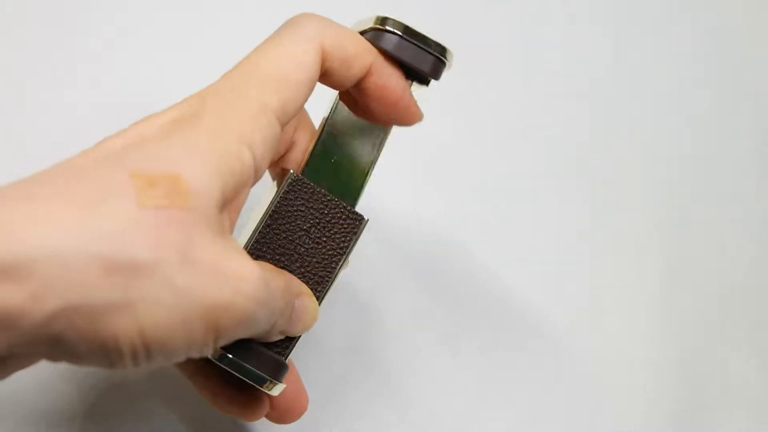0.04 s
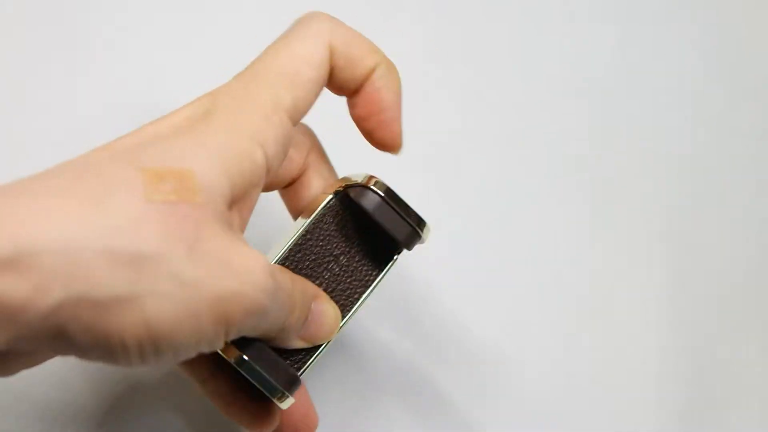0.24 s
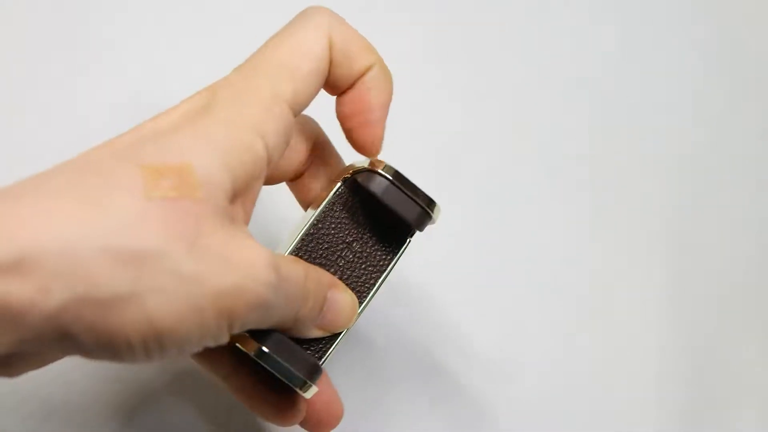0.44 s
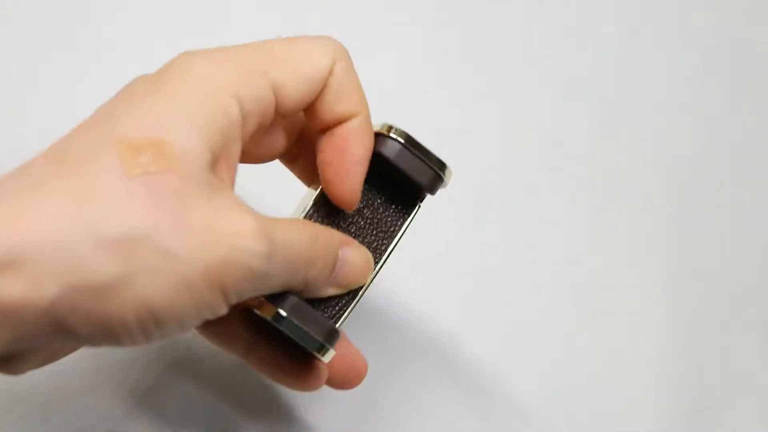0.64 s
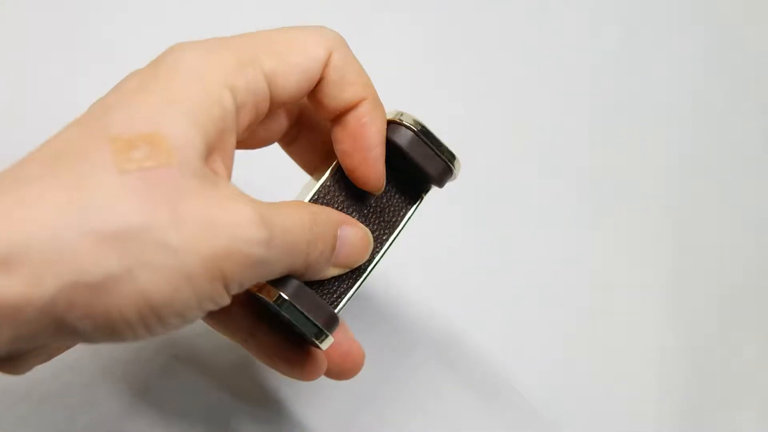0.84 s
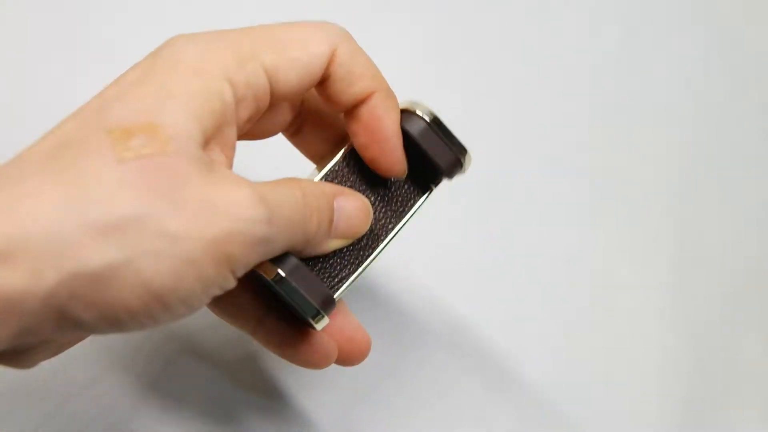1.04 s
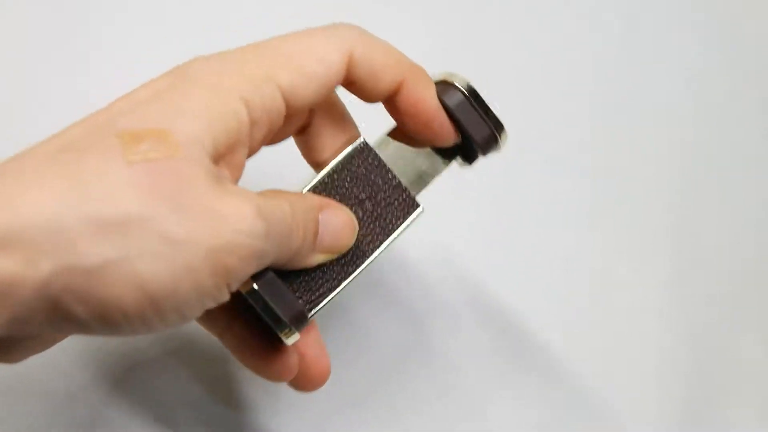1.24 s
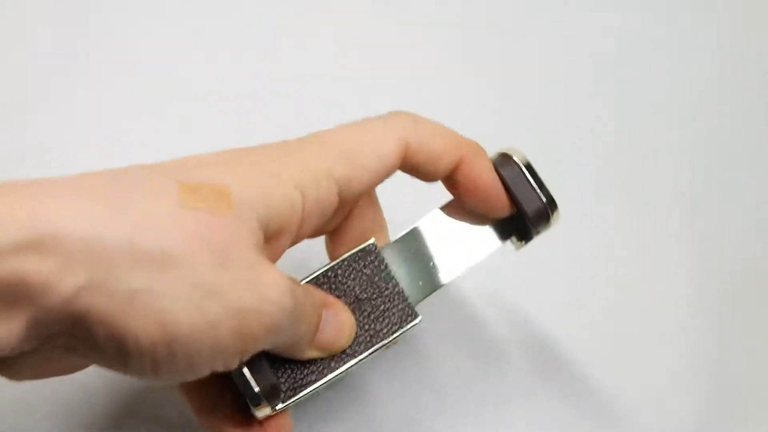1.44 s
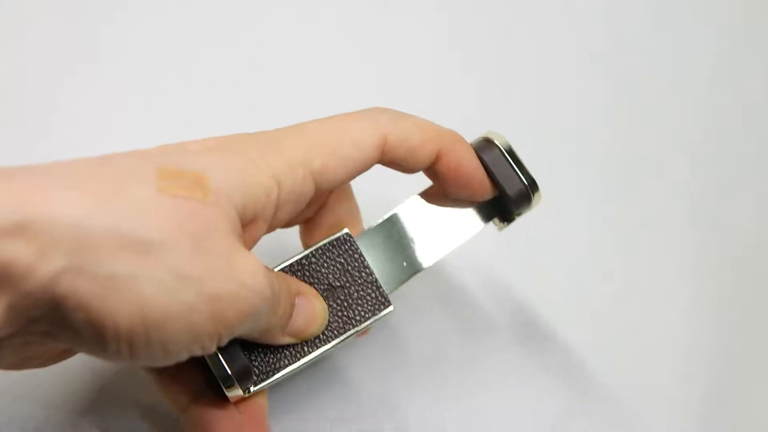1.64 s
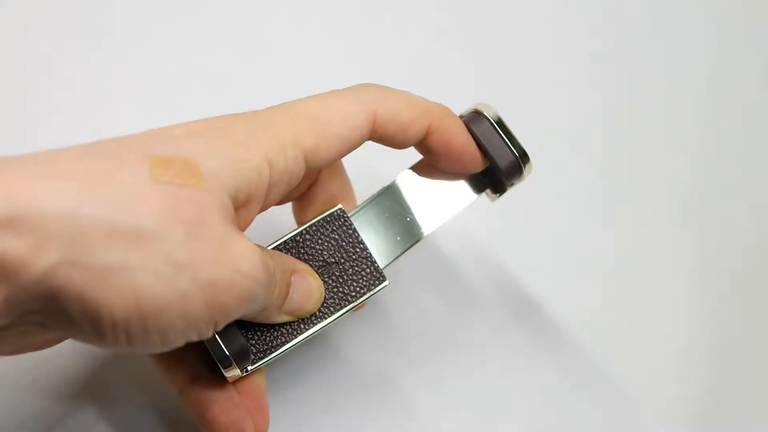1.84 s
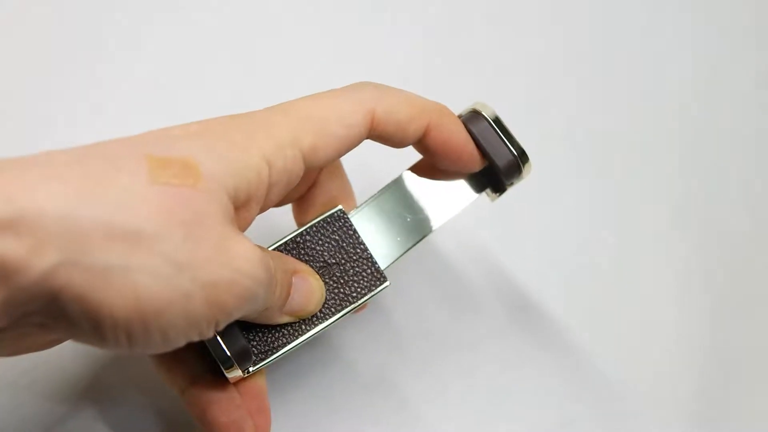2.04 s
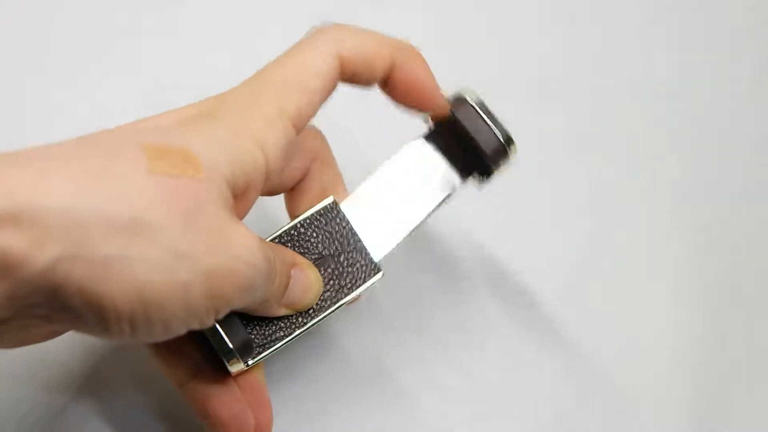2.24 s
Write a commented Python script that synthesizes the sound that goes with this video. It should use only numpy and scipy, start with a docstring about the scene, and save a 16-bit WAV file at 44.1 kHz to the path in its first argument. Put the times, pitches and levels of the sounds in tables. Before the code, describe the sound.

In a small, dry room, a hand-held metal clamp cracks shut on its spring, close up. Faint finger ticks follow, then the slide scrapes softly open and clicks against its far stop over low background hiss.

```python
"""A small, dry room: a hand-held, spring-loaded metal holder snaps shut close to the microphone.
The slide rushes home and cracks against its stop; a finger then draws it open with a faint scrape
until it clicks against the far stop. Each stop rings the metal and excites the room.
Fingers and catch tick lightly. Behind it a soft hiss and rumble swell and sink."""
import sys
import numpy as np
from scipy import signal
from scipy.fft import rfft, irfft
from scipy.io import wavfile

SR = 44100
rng = np.random.default_rng(int(sys.argv[2]) if len(sys.argv) > 2 else 0)


def put_to_file(sound):
    """Save the sound as 16-bit audio at rate SR, in the file named by the first command-line argument."""
    columns = np.atleast_2d(sound).T  # one column per channel
    safe = np.clip(columns, -1, 1)
    whole_steps = np.round(safe * 32767)
    wavfile.write(sys.argv[1], SR, whole_steps.astype(np.int16))


N = 101429
TIME_S = np.arange(N) / SR
RING_S = TIME_S[:SR // 2]
BINS_HZ = np.fft.rfftfreq(N, 1 / SR)

# left-right coherence, direct and diffuse sound: f/Hz, coherence/0-1
NEAR_COHERENCE = [(100, 0.5), (1500, .95), (3000, 0.4), (5000, 0.1), (15000, 0.6)]
ROOM_COHERENCE = [(100, .6), (640, 0.99), (1400, .62), (3100, .15), (7000, 0), (15000, 0)]


def amp(db):
    """Decibels to gain."""
    return 10 ** (np.asarray(db) / 20)


def read(points, hz):
    """Table lookup on a log-frequency axis."""
    table_hz, value = np.transpose(points)
    return np.interp(np.log(hz + 1), np.log(table_hz + 1), value)


def envelope(points):
    """Gain from rows of t/s, level/dB; silent outside them."""
    t_s, db = np.transpose(points)
    return amp(np.interp(TIME_S, t_s, db)) * (TIME_S >= t_s[0]) * (TIME_S <= t_s[-1])


def add(mix, start_s, sound):
    """Mixes in a stereo sound."""
    part = mix[:, round(start_s * SR):][:, :sound.shape[1]]
    part += sound[:, :part.shape[1]]


def convolve(x, response):
    """Filters each row, keeping its length."""
    return signal.fftconvolve(x, np.atleast_2d(response), axes=1)[:, :x.shape[1]]


def colour(x, eq, size=8192):
    """Minimum-phase filter from rows of f/Hz, gain/dB."""
    log_gain = np.log(amp(read(eq, abs(np.fft.fftfreq(size, 1 / SR)))))
    spectrum = np.exp(np.conj(signal.hilbert(log_gain)))
    return convolve(x, np.fft.ifft(spectrum).real[:size // 2])


def stereo_noise(length, coherence, gain=1):
    """Noise pair, correlated per frequency."""
    left, other = rfft(gain * rng.standard_normal((2, length)))
    shared = np.clip(read(coherence, np.fft.rfftfreq(length, 1 / SR)), -1, 1)
    right = shared * left + np.sqrt(1 - shared ** 2) * other
    return irfft(np.array([left, right]), length)


def background(levels, eq):
    """Room and microphone noise, swelling and sinking."""
    # left-right likeness: f/Hz, coherence/0-1
    coherence = [(30, 0.94), (60, .8), (120, 0.25), (300, 0.15), (1000, .35), (3000, 0.12), (15000, .05)]
    noise = unit_rms(colour(stereo_noise(N, coherence), eq))
    return noise * amp(np.interp(TIME_S, *np.transpose(levels)))


def unit_rms(x):
    """Scales to rms 1."""
    return x / np.sqrt(np.mean(x ** 2) + 1e-20)


def hiss(whine_hz=12640, width_hz=420, whine_db=7.5):
    """Broad hiss with one thin, bright band."""
    # swell: t/s, level/dB
    levels = [(0, -52.5), (.2, -57.5), (.33, -57.5), (.44, -54), (.75, -62), (1.09, -70.5), (1.2, -64),
              (1.31, -65.5), (1.45, -55), (1.6, -54.5), (1.8, -53.5), (2.05, -59.5), (2.3, -66)]
    # spectrum: f/Hz, gain/dB
    eq = [(30, -10.5), (120, 13.5), (300, 15), (600, 8.5), (1300, 5.5), (2500, 2.5), (5000, -0.5),
          (9000, -2), (16000, -1.5)]
    peak_db = whine_db / (1 + (2 * (BINS_HZ - whine_hz) / width_hz) ** 2)
    return irfft(rfft(background(levels, eq)) * amp(peak_db), N)


def rumble():
    """Low background noise."""
    # swell: t/s, level/dB
    levels = [(0, -51), (.22, -57), (.29, -62.5), (.42, -53), (.7, -60.5), (.9, -68.5), (1.1, -74),
              (1.22, -68), (1.35, -68), (1.5, -58.5), (1.64, -53.5), (1.98, -59), (2.3, -66.5)]
    # spectrum: f/Hz, gain/dB
    eq = [(10, -7), (38, -4), (60, -1.5), (85, -11.5), (120, -4), (170, -14.5), (400, -33), (2000, -61.5)]
    return background(levels, eq)


def friction(levels, eq, grains_per_s, spread_db):
    """Surface grains of uneven size catch at random."""
    sizes = amp(spread_db * np.minimum(rng.exponential(1, N), 4))
    catches = rng.random(N) < grains_per_s / SR
    grains = stereo_noise(N, NEAR_COHERENCE, gain=sizes * catches)
    return envelope(levels) * unit_rms(colour(grains, eq))


def burst(decay_s, coherence):
    """Dying cloud of tiny impacts: whitened noise, energy 1 per channel."""
    fade = amp(-60 * RING_S / decay_s)
    spectrum = rfft(stereo_noise(len(RING_S), coherence) * fade)
    white = irfft(spectrum / (abs(spectrum) + 1e-12), len(RING_S))
    cloud = white * np.sqrt(fade)
    return cloud / np.linalg.norm(cloud, axis=1, keepdims=True)


def strike(blows, eq, crack_s, rattle_s, rattle_db):
    """Each blow on a stop cracks and rattles the loose parts."""
    out = np.zeros((2, N))
    for start_s, db in blows:
        crack = burst(crack_s, NEAR_COHERENCE)
        rattle = amp(rattle_db) * burst(rattle_s, NEAR_COHERENCE)
        add(out, start_s, amp(db) * (crack + rattle))
    return colour(out, eq)


def ring(blow, modes):
    """A blow rings the holder's modes; low coherence puts the channels out of phase."""
    out = np.zeros((2, N))
    start_s, blow_db = blow
    for hz, db, t60_s in modes:
        skew_rad = np.pi * (1 - read(NEAR_COHERENCE, hz)) * rng.uniform(-1, 1) / 2
        phase = 2 * np.pi * (hz * RING_S + rng.random()) + np.array([[skew_rad], [-skew_rad]]) / 2
        add(out, start_s, amp(blow_db + db - 60 * RING_S / t60_s) * np.sin(phase))
    return out


def room(x, send_eq, t60_scale, build_s=0.0043):
    """Diffuse tail of a furnished room: each band stores energy and lets it die away."""
    # base reverberation time: f/Hz, t60/s
    band_t60 = [(100, 0.073), (800, .15), (2000, 0.12), (5000, .14), (15000, 0.14)]
    frames = dict(fs=SR, nperseg=256, noverlap=192)
    hz, t_s, spectra = signal.stft(x, **frames)
    t60_s = t60_scale * read(band_t60, hz)[:, None]
    decay = amp(-60 * t_s / t60_s) * (1 - np.exp(-(t_s / build_s) ** 2))
    decay /= np.linalg.norm(decay, axis=1, keepdims=True)
    energy = abs(convolve((abs(spectra) ** 2).mean(0), decay ** 2))
    noise = signal.stft(stereo_noise(N, ROOM_COHERENCE), **frames)[2]
    tail = signal.istft(noise * np.sqrt(energy / np.mean(abs(noise) ** 2)), **frames)[1]
    return colour(tail[:, :N], send_eq)


def snap_shut():
    """The spring drags the slide along its rails and slams it into the stop."""
    # rail friction, blows on the stop: t/s, level/dB
    rush_levels = [(.224, -57), (.2275, -37), (.230, -26.5), (.233, -16), (.237, -20), (.2405, -8.5),
                   (.243, -36.5)]
    blows = [(.2405, 13.5), (.2418, 10.5)]
    # spectra of rush, crack and room send: f/Hz, gain/dB
    rush_eq = [(80, -30), (400, -6.5), (700, -8), (1200, -14.5), (2400, -1), (4500, 0), (7000, -2.5),
               (10000, -4), (13000, 0.5), (16000, -3)]
    crack_eq = [(60, -22.5), (200, -12), (450, -16.5), (680, -12), (900, 0), (1350, -12), (2100, 3.5),
                (3000, 0.5), (6000, -1), (10000, 1), (12500, 5.5), (16000, 0)]
    room_eq = [(100, -19.5), (450, -16), (750, -8), (1000, -11), (1300, -7), (2000, -4.5), (2450, -7),
               (3000, -4.5), (3900, -4), (5200, -2.5), (9000, -4.5), (15000, -8)]
    # closed holder's modes: f/Hz, level/dB re blow, t60/s
    modes = [(2050, -43, .07), (2340, -34, 0.072), (3656, -37, .1), (5575, -40, 0.12), (6870, -40, 0.08),
             (7575, -37.5, .1), (8300, -37.5, 0.069), (8748, -69, .38), (8985, -68, .4),
             (11650, -36.5, .09), (12660, -38.5, 0.038), (13320, -35, 0.054), (13490, -37, .09)]
    rush = friction(rush_levels, rush_eq, grains_per_s=18000, spread_db=-0.5)
    direct = rush + strike(blows, crack_eq, crack_s=0.012, rattle_s=0.046, rattle_db=-6)
    return direct + ring(blows[0], modes) + room(direct, room_eq, t60_scale=1.0)


def ticks(decay_s=0.017, room_db=-5):
    """Fingers and catch tap the case, each in its own band."""
    # taps: t/s, level/dB, f/Hz, half-width/octaves
    taps = [(0.49, -29.5, 4900, .9), (.491, -39, 1060, 0.24), (0.774, -37.5, 13000, .6),
            (1.378, -38.5, 2500, 0.34), (1.468, -30.5, 2860, 0.49)]
    out = np.zeros((2, N))
    hz = np.geomspace(50, SR / 2, 60)
    for start_s, db, centre_hz, octaves in taps:
        band_db = -20 * np.log10(1 + (np.log2(hz / centre_hz) / octaves) ** 2)
        tick = colour(burst(decay_s, NEAR_COHERENCE), np.transpose([hz, band_db]))
        add(out, start_s, amp(db) * tick / np.linalg.norm(tick[0]))
    return out + amp(room_db) * room(out, send_eq=[(0, 0)], t60_scale=1.1)


def slide_open():
    """The drawn slide scrapes faintly; the spring slips once on its guide."""
    # slide friction: t/s, level/dB
    scrape_levels = [(1.09, -86.5), (1.115, -64.5), (1.15, -59.5), (1.18, -76), (1.23, -69), (1.31, -79),
                     (1.327, -59), (1.35, -50), (1.39, -61.5), (1.45, -75), (1.53, -53.5), (1.56, -64.5),
                     (1.62, -51), (1.70, -58), (1.85, -65.5), (2.05, -79)]
    # spring slip: t/s, level/dB, decay/s
    slip = (1.3355, -19.5, 0.31)
    # spectra: f/Hz, gain/dB
    scrape_eq = [(200, -15), (1200, -20), (2500, -2.5), (3600, -6.5), (4800, 1), (6000, -1), (9000, 1),
                 (12000, -0.5), (16000, -5)]
    slip_eq = [(500, -30), (2500, -8), (3800, -17), (4900, 11), (5900, -6), (6700, 9), (8000, -1),
               (11800, 7), (14000, 4), (16000, 0)]
    out = friction(scrape_levels, scrape_eq, grains_per_s=16000, spread_db=1.7)
    start_s, db, decay_s = slip
    add(out, start_s, amp(db) * colour(burst(decay_s, ROOM_COHERENCE), slip_eq))
    return out


def click_open():
    """The slide grazes the far stop and lands with a lighter, hollower click."""
    # graze, blows on the far stop: t/s, level/dB
    graze_levels = [(1.554, -61), (1.5555, -59), (1.558, -41), (1.559, -58)]
    blows = [(1.5580, -2.5), (1.5603, -12)]
    # spectra of click and room send: f/Hz, gain/dB
    click_eq = [(80, -15), (350, -6.5), (620, -6), (900, 9), (1060, 2), (1350, 11.5), (1650, -4.5),
                (1850, 5), (2150, -3), (2550, 4), (2950, 10), (3450, -1), (4200, 2), (5400, -3), (7000, 1),
                (8700, 2), (12000, -2.5), (16000, -7)]
    room_eq = [(100, -9.5), (600, -12.5), (900, -9), (1400, 0.5), (3000, -11.5), (4200, -11), (6500, -6.5),
               (10000, -5), (15000, -2)]
    # extended holder's modes: f/Hz, level/dB re blow, t60/s
    modes = [(830, -32.5, 0.04), (956, -28.5, 0.071), (1150, -58, 0.099), (1291, -31, .085),
             (1290, -33, 0.067), (1467, -30, 0.085), (1810, -34, .045), (2445, -34.5, 0.093),
             (4130, -43, 0.041), (7000, -44, 0.2), (7600, -54, .2), (9450, -49, 0.44)]
    graze = friction(graze_levels, click_eq, grains_per_s=23000, spread_db=1)
    direct = graze + strike(blows, click_eq, crack_s=0.0055, rattle_s=0.03, rattle_db=0.5)
    return direct + ring(blows[0], modes) + room(direct, room_eq, t60_scale=1.08)


def scene():
    """The holder, its treble a little to the right, over hiss and rumble."""
    # right boost and equal left cut: f/Hz, gain/dB
    balance = [(150, -2), (450, -2), (1000, -0.4), (2500, 0.1), (4500, 1.96), (15000, 1.1)]
    holder = snap_shut() + click_open() + slide_open() + ticks()
    right_db = read(balance, BINS_HZ)
    panned = irfft(rfft(holder) * amp([-right_db, right_db]), N)
    return panned + hiss() + rumble()


def record(dry, cutoff_hz=15800):
    """Clips at full scale, then low-passes."""
    lowpass = signal.firwin(511, cutoff_hz, window=("kaiser", 9), fs=SR)
    return signal.oaconvolve(np.clip(dry, -1, 1), lowpass[None], "same")


dry = scene()
out = record(dry)
put_to_file(out)
```